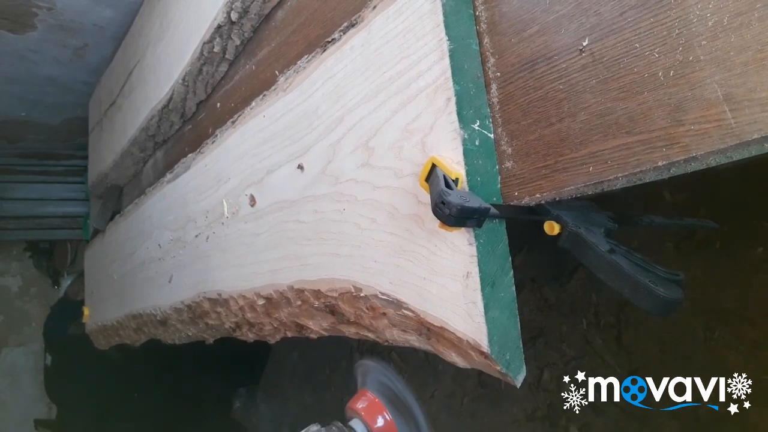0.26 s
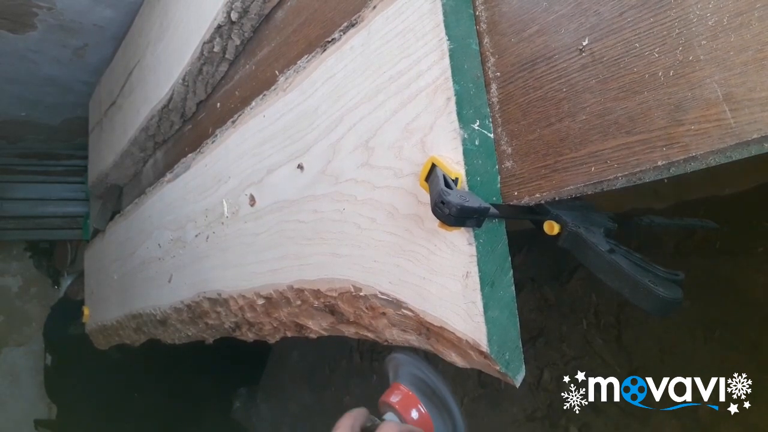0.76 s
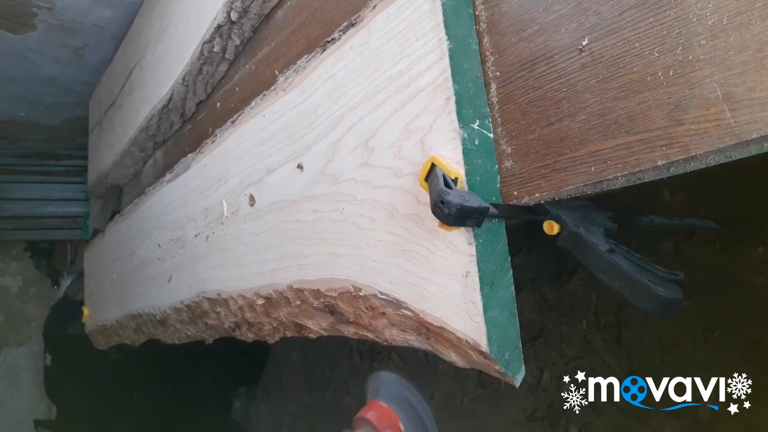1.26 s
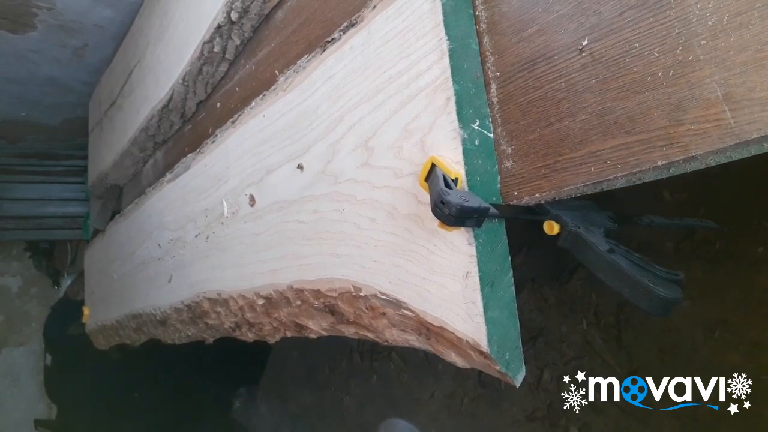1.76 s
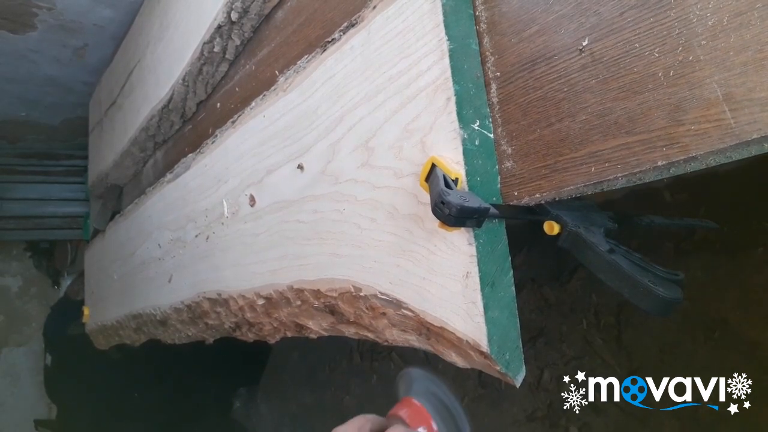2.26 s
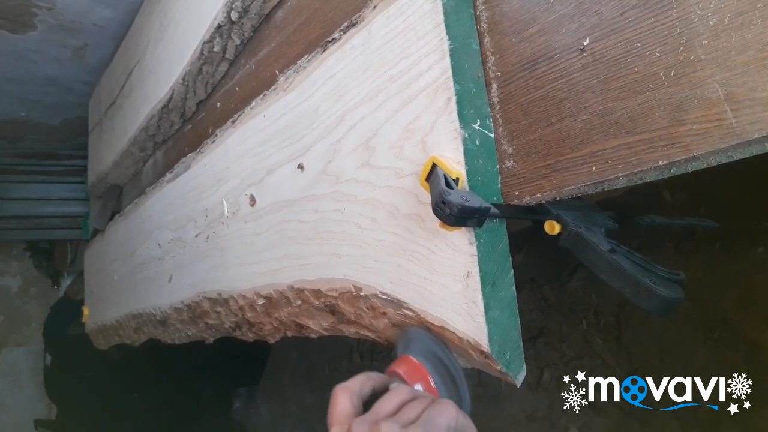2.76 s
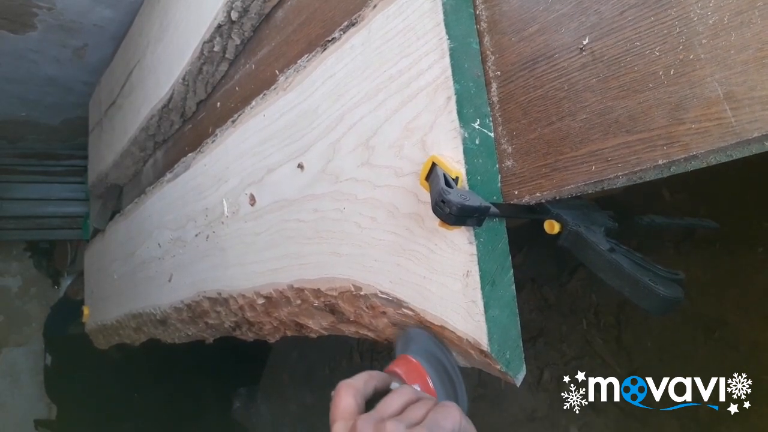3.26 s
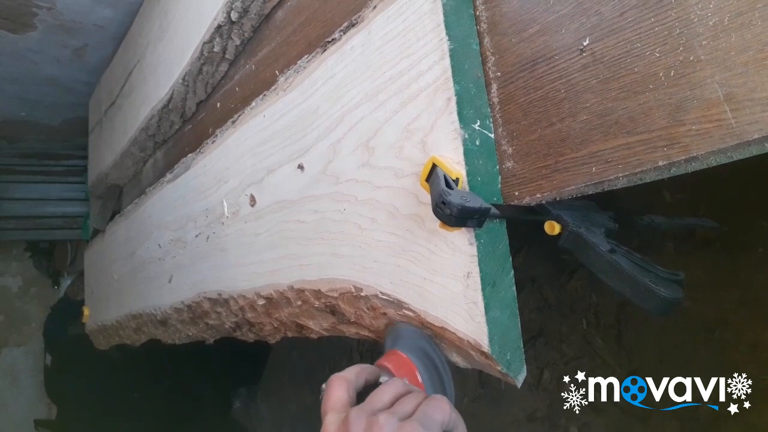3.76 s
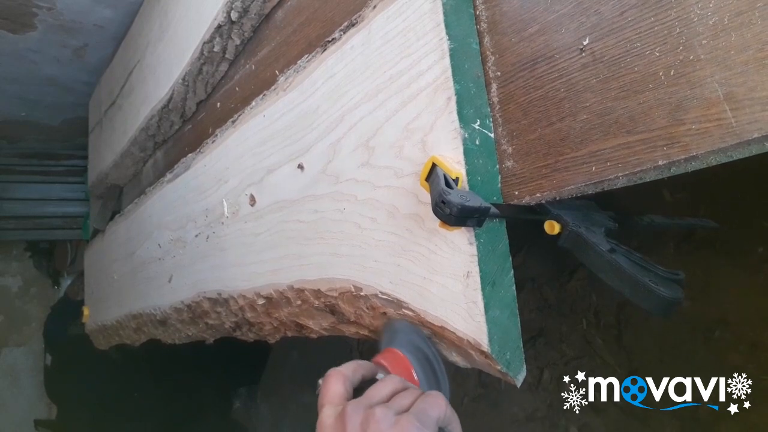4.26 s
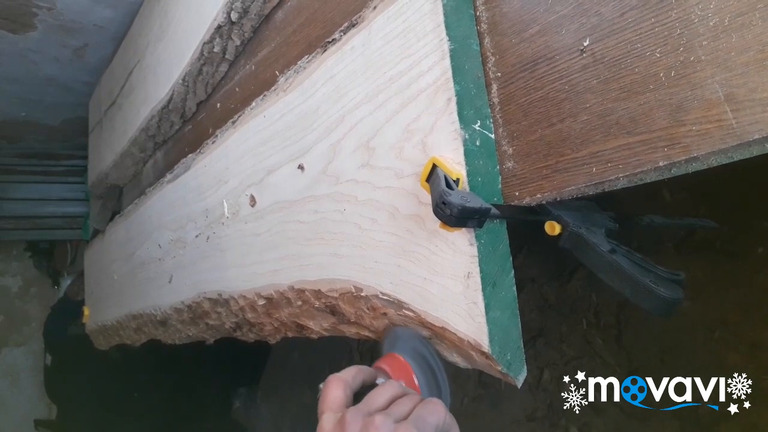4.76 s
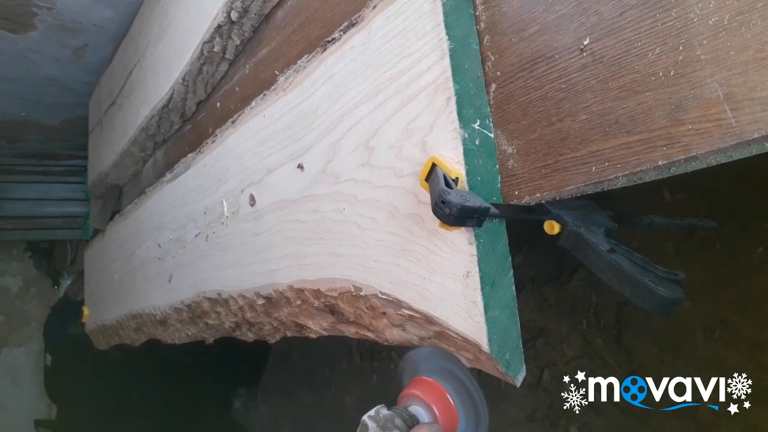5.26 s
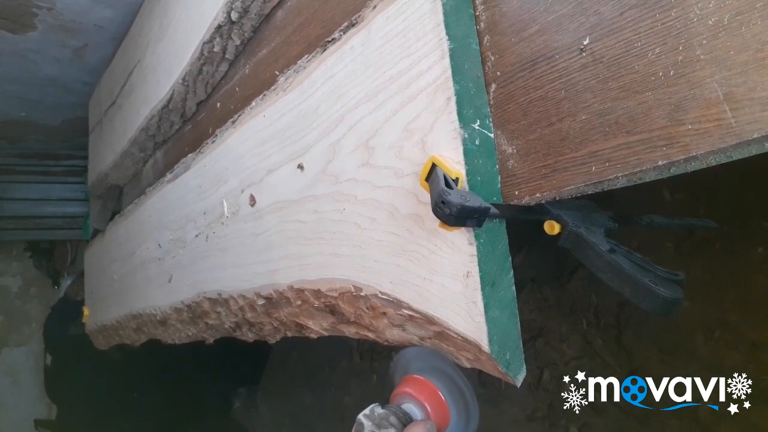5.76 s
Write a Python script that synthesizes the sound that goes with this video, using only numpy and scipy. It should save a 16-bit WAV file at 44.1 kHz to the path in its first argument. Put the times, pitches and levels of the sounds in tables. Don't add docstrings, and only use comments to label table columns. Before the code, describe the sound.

An angle grinder with a wire brush whines loudly, coasts down with a thin whistle, snaps back on and grinds shuddering against rough bark.

```python
import sys
import numpy as np
from scipy import signal
from scipy.fft import rfft, irfft, next_fast_len
from scipy.io import wavfile
from scipy.ndimage import uniform_filter1d, map_coordinates

SR = 44100
rng = np.random.default_rng(int(sys.argv[2]) if len(sys.argv) > 2 else 0)


def volts_from_decibels(level):
    exponent = np.asarray(level, float) / 20
    return 10 ** exponent


def waveform_to_disk(signal):
    frames = np.transpose(np.atleast_2d(signal))
    scaled = np.clip(frames, -1, 1) * 32767
    samples = np.round(scaled).astype(np.int16)
    wavfile.write(sys.argv[1], SR, samples)


N = 265041
TIME_S = np.arange(N) / SR

# f/Hz, width/Hz, level/dB
BENCH_MODES = [(219, 14, 11.5), (308, 9.2, 6), (577, 32, 9), (710, 28, -3.5), (950, 33, -0.5),
               (1695, 37, 4), (2344, 18, 8), (3124, 120, 0.5), (4493, 53, 7.5), (267, 44, -8),
               (452, 40, -4), (1530, 43, 1.5), (6100, 32, -2.5), (6280, 36, 6.5)]
# t/s, peak level/dB, f/Hz
THUMPS = [
    (2.369, -76, 109.3),
    (4.97, -68, 110),
    (5.649, -63, 110.3),
    (5.919, -60, 110),
]
# t/s, level/dB
HIGH_BAND_LEVEL = [(0, -58), (3.7, -46), (4, -37), (4.5, -36), (4.95, -38), (5.1, -40), (6.01, -35)]
# t/s, level/dB
WHISTLE_LEVEL = [(1.43, -70), (1.47, -43), (1.58, -42), (1.7, -32), (1.88, -47), (1.91, -40), (1.935, -41),
                 (1.955, -68)]
# f/Hz, level/dB, t60/s
CASE_MODES = [
    (4170, -19.5, 0.19),
    (4530, -31, .2),
    (3700, -33, .06),
]

# t/s, share/0-1
DRIVE = [
    (0, 1),
    (.92, 1),
    (1.35, .23),
    (1.885, 0),
    (1.895, 1),
    (6.01, 1),
]
# t/s, spindle rate/Hz
POWERED_SPEED = [(0, 198), (.36, 203.97), (.9, 203.97), (1.88, 199), (2.55, 199.5), (2.7, 193.2),
                 (2.9, 171.4), (3.3, 164.4), (3.6, 163.9), (3.75, 165.7), (4.0, 165.9), (4.6, 170.9),
                 (4.95, 176.5), (5.1, 175.6), (5.25, 178), (5.27, 184.6), (5.6, 179.4), (6.01, 179)]
# t/s, pressure/0-1
PRESSURE = [
    (0, 0.3),
    (.3, .05),
    (.9, 0.03),
    (2.7, 0.31),
    (2.95, 1),
    (5.2, 1),
    (5.3, 0.47),
    (6.01, 0.52),
]
# t/s, lift/dB
STROKES = [(3.12, 6), (3.27, 6), (3.42, 8), (3.57, 9), (3.72, 8), (3.86, 8), (3.98, 8), (4.1, 10),
           (4.26, 10), (4.42, 9), (4.53, 8), (4.68, 6), (4.84, 9), (5.0, 9), (5.14, 9)]
# t/s, half length/s, level/dB
SCUFFS = [(1.71, .03, 1), (1.82, .02, 1.5), (1.92, 0.024, 6.5), (2.29, .04, -1.5), (3.41, .02, 2),
          (3.48, .02, -0.5), (5.01, 0.035, 3), (5.09, 0.022, -1.5), (5.14, 0.023, 2.5), (5.48, .04, 2),
          (5.69, 0.045, 1.5), (5.94, 0.045, 0.5)]

# free level/dB, gain on bark/dB, coasting change/dB, facing-away change/dB
LOW_ORDERS = [
    (-69, 6.5, -5, -6),
    (-67, 12.5, -8, -2),
    (-69.5, 1, -2.5, 1),
]
# t/s, half length/s, level/dB
SHUDDERS = [
    [(.84, 0.059, 17), (.98, .07, 14), (2.55, 0.24, 15), (5.35, 0.073, -9), (5.75, .2, 7)],
    [(.97, .07, 11.5), (2.0, 0.03, 9), (2.56, 0.13, 18), (3.55, 0.23, 6)],
    [(1.3, 0.23, 3), (2.0, 0.073, 14.5), (2.45, 0.36, 8), (2.78, 0.12, 6), (5.42, 0.063, 10),
     (5.62, 0.054, 2), (5.92, .06, 10)],
]
# f/Hz, width/Hz, level/dB
PLANK_MODES = [(412, 27, 4.5), (546.47, 88, 11)]
# order/turn, level/dB
UPPER_ORDERS = [(4, -61.5), (5, -60), (6, -71), (7, -70), (9, -62), (10, -62), (13, -64), (14, -56),
                (18, -53), (11, -60.5), (8, -70), (19, -54)]
# t/s, level/dB
CHATTER = [(0, -6), (2.8, 6), (3.1, 3), (4.4, -0.5), (4.8, 2.5), (5.2, -3), (5.38, 13), (5.47, 4.5),
           (6.01, 8)]
# t/s, tooth tone level/dB, run-out level/dB
MESH_LEVEL = [(0, -40, -42), (.2, -31, -43), (.32, -38, -46), (.42, -27, -46), (.62, -26, -46),
              (.81, -27, -43), (.92, -42, -43), (1.9, -40, -51), (2.17, -30, -35), (2.42, -29, -36),
              (2.56, -37, -28), (2.8, -30, -35), (2.95, -34, -46), (3.5, -34, -50), (3.8, -28, -38),
              (4.3, -29, -42), (4.6, -28, -35), (6.01, -30, -36)]
# offset/orders, level over run-out/dB
RUN_OUT = [
    (-2, -6),
    (1, 3),
]

# t/s, effort/dB
EFFORT = [(0, 0.5), (.85, 0.4), (1.34, -9), (1.6, -11.5), (1.885, -10.5), (1.9, -6), (2.04, 0.7),
          (2.64, 0.4), (3.0, -2), (3.45, -4), (3.78, -2), (4.9, -1), (5.25, -1), (6.01, 0.5)]
# t/s, level/dB
REPEATING = [(0, 1), (1, -8), (2, -9), (2.9, -5), (3.1, -13), (3.8, 0), (4.5, -6), (5.26, -41), (5.3, -5.5),
             (6.01, -6.5)]
# f/Hz, level/dB per Hz
HOUSING_DRIVEN = [(35, -69), (60, -48), (129, -38), (177, -22), (272, -15), (331, -13), (417, -8),
                  (544, -10.5), (616, -14.5), (661, -7), (1670, 0.5), (2180, -2), (4200, -0.5), (5460, -16),
                  (9240, -120)]
# f/Hz, level/dB per Hz
HOUSING_COASTING = [(35, -89), (60, -65), (118, -30), (141, -22), (159, -50), (212, -23), (349, -20),
                    (374, -20), (616, -18), (1550, -3), (2100, -9.5), (3390, -13.5), (4200, -1), (5460, -7),
                    (9240, -120)]
# f/Hz, level/dB per Hz
HISS_SPECTRUM = [(2000, -120), (5000, -12.5), (8500, -1.0), (8970, -4), (10600, -4.5), (13000, -4.5),
                 (15600, -9)]

# t/s, whine level/dB, share following the tooth rate/dB
GEAR_LEVEL = [(0, -18, -2), (.15, -18.5, -3.5), (.35, -21.5, -5), (.37, -18.5, -3), (.77, -20, -4.5),
              (.89, -16, -1.5), (1.0, -23.5, -3.5), (1.45, -32, -3), (1.885, -33, -1), (1.905, -23, -4.5),
              (2.14, -16.5, -3), (2.86, -19, -3), (2.91, -20, -7), (3.45, -22.5, -5.5), (3.75, -20, -5),
              (5.12, -18, -4), (5.36, -19, -3), (6.01, -19.5, -5)]
# f off the tooth rate/Hz, level/dB per Hz
SKIRT_SPECTRUM = [(20, 3.5), (100, 2), (250, 3), (600, -3), (1500, -15), (4000, -46.5)]
# f/Hz, level/dB per Hz
CASE_SPECTRUM = [(1940, -37), (3300, -12.5), (3780, -12), (3970, -6), (4460, -9), (4810, -2.5), (7160, 6),
                 (9300, -8.5), (10500, -12.5), (13600, -34), (22000, -120)]
# offset from tooth rate/orders, level under tooth tone/dB
SIDEBANDS = [
    (-1, -7),
    (2, -16),
    (3, -24),
]
# t/s, low f/Hz, high f/Hz
EAR_FLECKS = [(0.913, 10340.0, 11710.0), (3.071, 14470.0, 15740), (3.092, 5600.0, 6980.0),
              (3.327, 5170, 6370.0), (3.327, 7490.0, 9040.0), (3.419, 4250, 5160), (3.422, 7490.0, 9000),
              (5.207, 6850, 8350.0), (5.234, 13090.0, 14470.0), (5.443, 8270.0, 9650.0),
              (5.74, 11630.0, 13180.0), (5.971, 4220.0, 5770.0)]

TEETH, BEARING_ORDER = 37, 115.2
SWITCH_OFF_S, SWITCH_ON_S, SPIN_UP_S = .902, 1.885, .165
DRAG_S, DRAG_POWER = 3.902, 3.045
CHANGE_S, FADE_OUT_S, FADE_IN_S = 5.2661, .0008, .009
FACING_AWAY = TIME_S > CHANGE_S


def unit(x):
    return x / np.sqrt(np.mean(x ** 2) + 1e-20)


def curves(rows):
    s, *columns = np.transpose(rows)
    return [np.interp(TIME_S, s, column) for column in columns]


def wobble(rate_hz):
    coarse = np.arange(0, N + 32, 32)
    knots = rng.standard_normal(int(N * rate_hz / SR) + 4)
    return np.interp(np.arange(N), coarse, map_coordinates(knots, [coarse * rate_hz / SR]))


def filtered(x, gain_of_hz):
    m = next_fast_len(N + 8192)
    return irfft(rfft(x, m) * gain_of_hz(np.fft.rfftfreq(m, 1 / SR)), m)[:N]


def coloured(x, spectrum):
    hz, db = np.transpose(spectrum)
    return unit(filtered(x, lambda f: volts_from_decibels(np.interp(np.log(f + 1), np.log(hz + 1), db))))


def patchy(depth_db):
    z = signal.stft(rng.standard_normal(N), nperseg=512)[2]
    field = uniform_filter1d(rng.standard_normal(z.shape), 6, 0)
    field = unit(uniform_filter1d(field, 12, 1))
    return signal.istft(z * volts_from_decibels(depth_db * field), nperseg=512)[1][:N]


def resonance_db(f, modes):
    return sum(db / (1 + (2 * (f - hz) / width) ** 2) for hz, width, db in modes)


def swells_db(rows):
    return sum(db * np.exp(-((TIME_S - s) / half) ** 2) for s, half, db in rows)


def strokes_db():
    return swells_db([(s, .028, db) for s, db in STROKES])


def coasting_db():
    return 30 * (curves(DRIVE)[0] - 1)


def speed_hz():
    held = curves(POWERED_SPEED)[0]
    coasted_s = np.clip(TIME_S - SWITCH_OFF_S, 0, SWITCH_ON_S - SWITCH_OFF_S)
    coast = held.max() * (1 + coasted_s / DRAG_S) ** -DRAG_POWER
    regained = 1 - np.exp(-np.clip(TIME_S - SWITCH_ON_S, 0, None) / SPIN_UP_S)
    return np.where(TIME_S < SWITCH_OFF_S, held, coast + (held - coast) * regained)


def turning():
    hz, pressure = speed_hz(), curves(PRESSURE)[0]
    snag = pressure * (0.002555 * wobble(9) + 0.001942 * wobble(30))
    slowed = 1.002 + snag - .0011 * strokes_db()
    return np.cumsum(hz * slowed - .002 * hz * (1 - pressure)) / SR


def tone(turns, order, db, unsteady_db):
    wander = .45 * wobble(7) + .85 * wobble(18)
    level = np.sqrt(2) * volts_from_decibels(db + unsteady_db * wander)
    return level * np.sin(2 * np.pi * (order * turns + rng.random()))


def workshop(x, wet_db, t60):
    t = np.arange(SR // 2) / SR
    tail = rng.standard_normal(len(t)) * volts_from_decibels(-60 * t / t60) * (t > .004)
    heard = x + volts_from_decibels(wet_db) * signal.fftconvolve(x, tail / np.linalg.norm(tail))[:N]
    resonant = filtered(heard, lambda f: volts_from_decibels(resonance_db(f, BENCH_MODES)))
    return resonant / np.sqrt(1 + volts_from_decibels(2 * wet_db))


def thumps():
    total = 0
    for s, db, hz in THUMPS:
        bump = np.exp(-((TIME_S - s - .015) / 0.017) ** 2)
        total = total + volts_from_decibels(db) * bump * np.sin(2 * np.pi * hz * TIME_S)
    return total


def engage():
    t = np.clip(TIME_S - SWITCH_ON_S - .005, 0, None)
    ring = 0
    for hz, db, t60 in CASE_MODES:
        decay = volts_from_decibels(db - 60 * t / t60 + 2.5 * wobble(60.4))
        ring = ring + decay * np.sin(2 * np.pi * hz * t)
    return ring * (1 - np.exp(-t / .012))


def whistle(turns):
    before, after = (WHISTLE_LEVEL[0][0] - .02, -120), (WHISTLE_LEVEL[-1][0] + .01, -120)
    level_db = curves([before, *WHISTLE_LEVEL, after])[0]
    return tone(turns + .0012 * wobble(250), BEARING_ORDER, level_db, unsteady_db=-2.0)


def high_band():
    hz, width = 12600, 650
    band = [(hz - 4 * width, -60), (hz - width, -12), (hz, 0), (hz + width, -12), (hz + 4 * width, -60)]
    return volts_from_decibels(curves(HIGH_BAND_LEVEL)[0] + 1.5 * wobble(5.4)) * coloured(rng.standard_normal(N), band)


def unbalance(turns):
    pressure, idle = curves(PRESSURE)[0], 1 - curves(DRIVE)[0]
    spin, total = speed_hz(), 0
    for k, (levels, shudders) in enumerate(zip(LOW_ORDERS, SHUDDERS), start=1):
        free_db, bark_db, coast_db, away_db = levels
        level_db = free_db + bark_db * pressure ** 2 + coast_db * idle + away_db * FACING_AWAY
        level_db = level_db + resonance_db(k * spin, PLANK_MODES) + swells_db(shudders)
        total = total + tone(turns, k, level_db, unsteady_db=1.5 + 1.2 * FACING_AWAY)
    return total


def chatter(turns):
    pull_db = 18 * (curves(DRIVE)[0] - 1) + curves(CHATTER)[0] + strokes_db() - 2.5
    return sum(tone(turns, order, db + pull_db, unsteady_db=3.5) for order, db in UPPER_ORDERS)


def mesh(turns):
    tooth_db, out_db = curves(MESH_LEVEL)
    pressure = curves(PRESSURE)[0]
    shake_db = .8 + 4.2 * pressure
    seat_db = coasting_db() + 3 * pressure - .9 * strokes_db()
    beside = sum(tone(turns, TEETH + off, out_db + db + seat_db, shake_db - 2.0) for off, db in RUN_OUT)
    return beside + tone(turns, TEETH, tooth_db + seat_db, shake_db)


def wires(turns):
    pattern = rng.standard_normal((70, 160))
    return unit(map_coordinates(pattern, [TIME_S * 11, turns % 1 * 160], mode="grid-wrap"))


def roar(turns, surge):
    effort_db, pressure = curves(EFFORT)[0] + swells_db(SCUFFS), curves(PRESSURE)[0]
    driven = np.clip(curves(DRIVE)[0], 0, 1)
    bite_db = strokes_db() - 6.0 + 1.6 * pressure * wobble(16)
    excitation = patchy(depth_db=0.5) * 2.26 + volts_from_decibels(curves(REPEATING)[0] + bite_db) * wires(turns)
    housing = np.sqrt(driven) * coloured(excitation, HOUSING_DRIVEN)
    housing = housing + np.sqrt(1 - driven) * coloured(excitation, HOUSING_COASTING)
    housing_db = -33.5 + 0.85 * effort_db + pressure - 2.5 * FACING_AWAY
    housing_db = housing_db + 0.41 * surge + 0.093 * strokes_db()
    scrape = volts_from_decibels(0.49 * wobble(16) + 0.92 * wobble(60))
    hiss = unit(scrape * coloured(patchy(depth_db=-0.4), HISS_SPECTRUM))
    hiss_db = -24 + effort_db + 0.18 * surge
    return volts_from_decibels(housing_db) * housing + volts_from_decibels(hiss_db) * hiss


def gears(turns, surge):
    whine_db, follow_db = curves(GEAR_LEVEL)
    follow = np.clip(volts_from_decibels(follow_db), 0, 1) * np.clip(curves(DRIVE)[0], .45, 1)
    angle = 2 * np.pi * TEETH * turns
    skirt = coloured(rng.standard_normal(N), SKIRT_SPECTRUM) * np.cos(angle)
    skirt = skirt + coloured(rng.standard_normal(N), SKIRT_SPECTRUM) * np.sin(angle)
    strike = patchy(depth_db=1.53) + volts_from_decibels(curves(REPEATING)[0] - 12) * wires(turns)
    case = coloured(strike, CASE_SPECTRUM)
    noise = follow * skirt + np.sqrt(1 - follow ** 2) * case
    line_db = curves(MESH_LEVEL)[0] + coasting_db()
    lines = sum(tone(turns, TEETH + off, line_db + db, unsteady_db=4.5) for off, db in SIDEBANDS)
    return volts_from_decibels(whine_db - 0.39 + 0.14 * surge) * noise + lines


def scene():
    turns, surge = turning(), wobble(8.2)
    room = workshop(high_band() + roar(turns, surge) + gears(turns, surge), wet_db=-6, t60=.22)
    close = thumps() + engage() + whistle(turns) + unbalance(turns) + chatter(turns) + mesh(turns)
    return np.tile(room + close, (2, 1))


def ear_flecks(x, size=2048):
    side, hz = np.zeros(N + size), np.fft.rfftfreq(size, 1 / SR)
    for s, low, high in EAR_FLECKS:
        at = round(s * SR) - size // 2
        band = rfft(x[at - size:at]) * (hz > low) * (hz < high)
        side[at:at + size] += volts_from_decibels(-0.5) * irfft(band) * np.hanning(size) ** 1.3
    return side[:N]


def top_cut(x):
    return signal.sosfilt(signal.butter(12, 15980, fs=SR, output="sos"), x)


def record(dry):
    x = dry[0] / (1 + np.abs(dry[0] / 0.6) ** 3.2) ** (1 / 4.4)
    t = TIME_S - CHANGE_S
    x = x * np.clip(np.maximum(-t / FADE_OUT_S, t / FADE_IN_S), .03, 1)
    hz = np.fft.rfftfreq(N, 1 / SR)
    bass_cut = 1 / (1 + (95 / (hz + 1)) ** 3)
    x = irfft(rfft(x) * (hz < 15730) * bass_cut, N)
    side = ear_flecks(x)
    return top_cut(np.array([x + side, x - side]))


dry = scene()
out = record(dry)
waveform_to_disk(out)
```